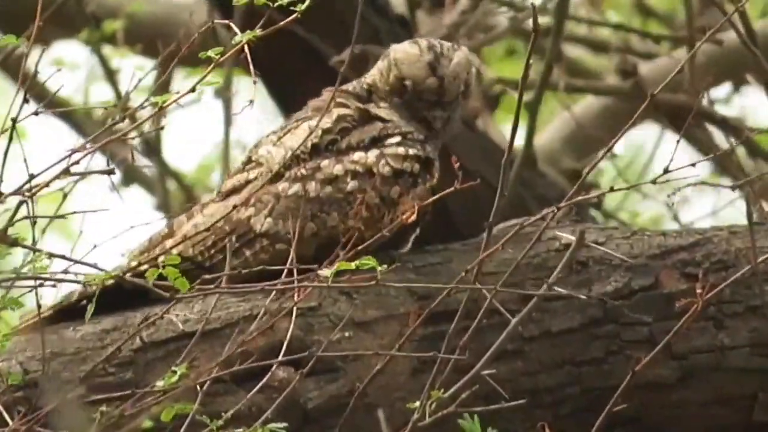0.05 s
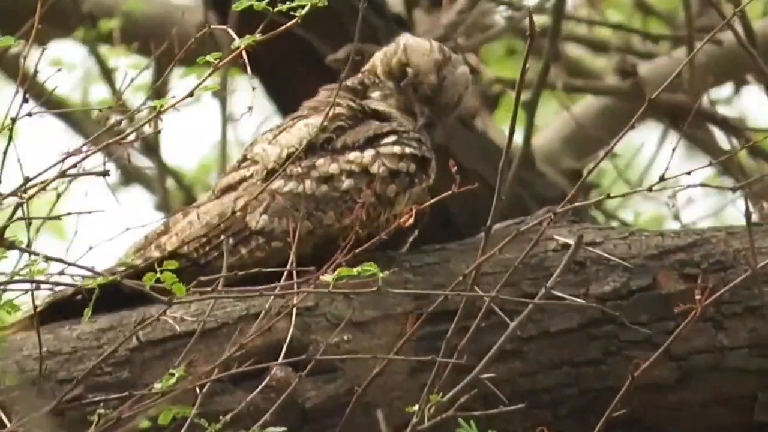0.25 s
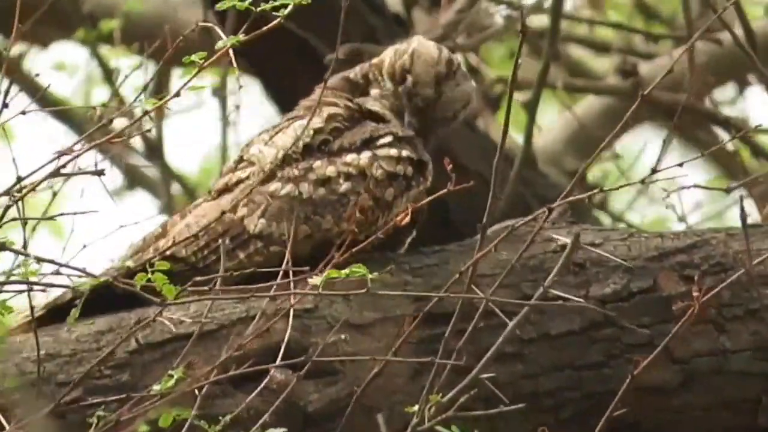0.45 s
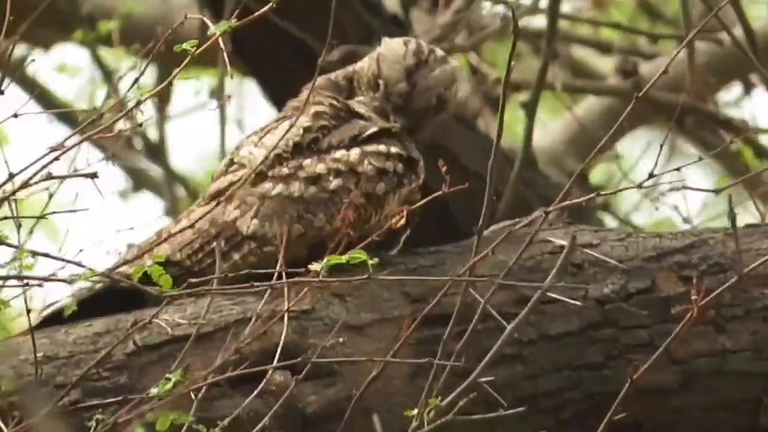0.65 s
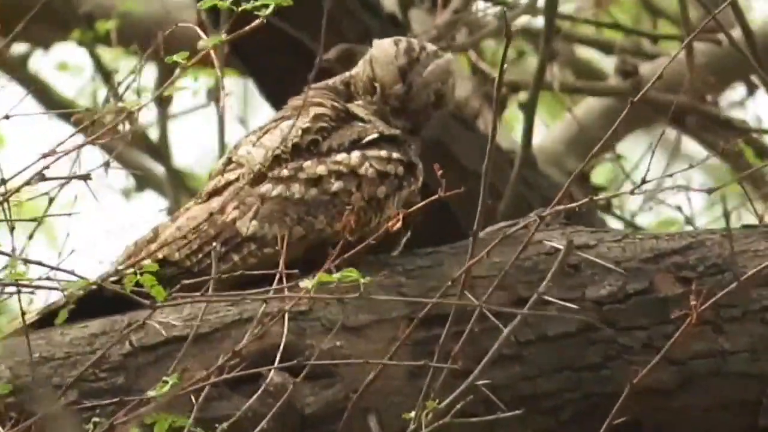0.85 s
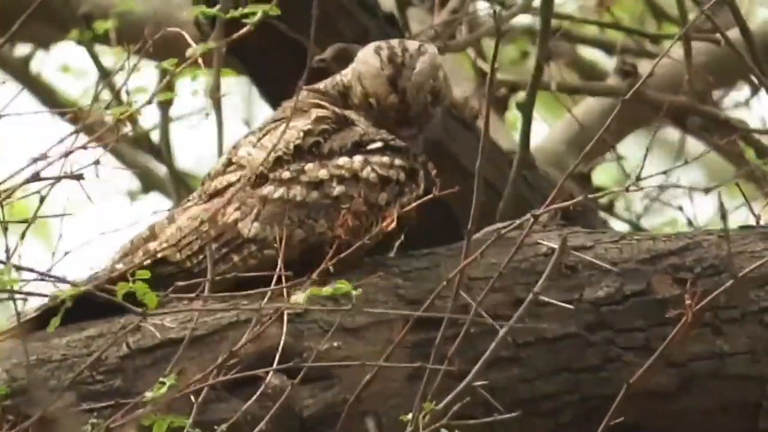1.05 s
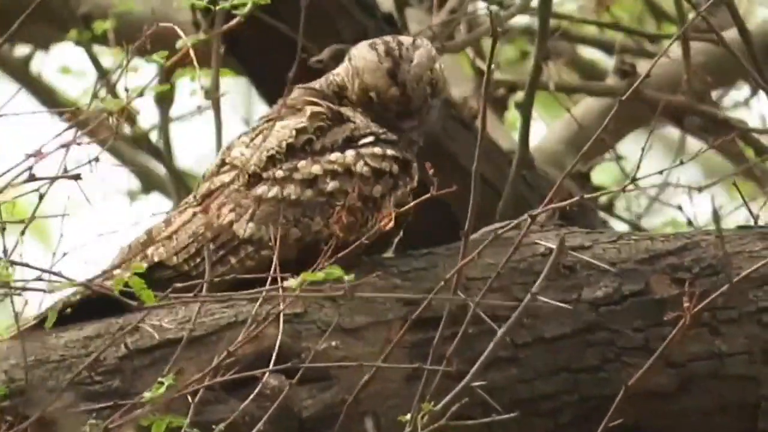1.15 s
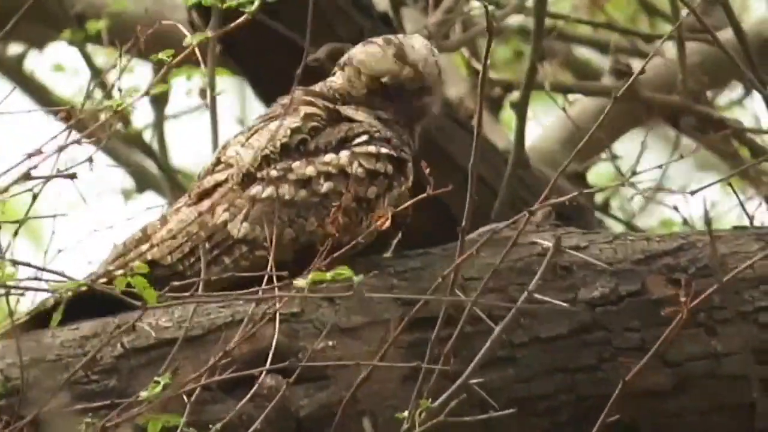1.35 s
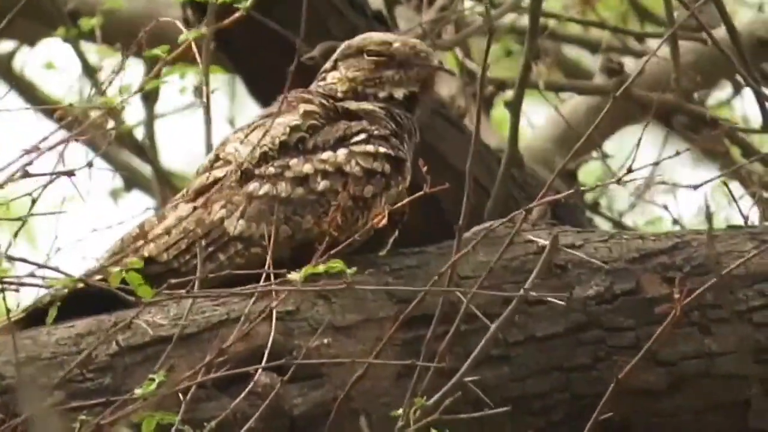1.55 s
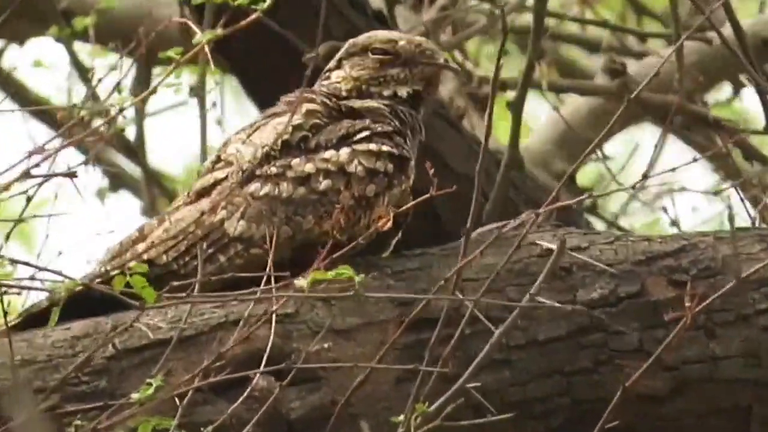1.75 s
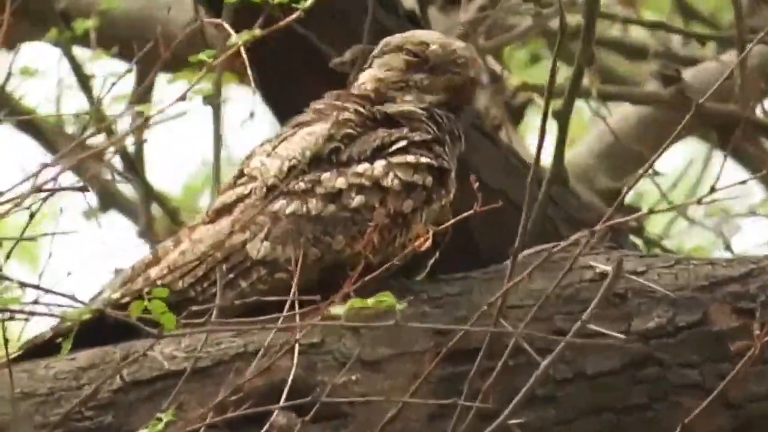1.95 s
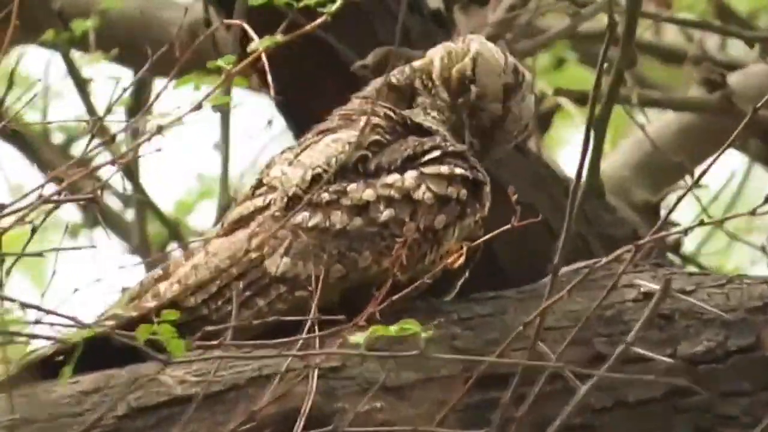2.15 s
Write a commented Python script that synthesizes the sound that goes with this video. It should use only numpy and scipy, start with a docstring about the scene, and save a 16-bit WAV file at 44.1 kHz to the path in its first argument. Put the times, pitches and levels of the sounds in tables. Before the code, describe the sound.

Wind flutters and thumps on the microphone, with faint distant bird chirps in a quiet wood.

```python
"""Wind on a camera in a wood

Light wind buffets the two microphone ports: short gusts flutter and single eddies thump.
Behind them lie a low rumble and the wide hiss of the trees, with a few faint, far bird notes
and one small tick near the end. A thin whine, probably the lens motor, runs throughout."""
import sys
import numpy as np
from scipy import signal
from scipy.fft import rfft, irfft
from scipy.io import wavfile
from scipy.ndimage import uniform_filter1d

SR = 44100
rng = np.random.default_rng(int(sys.argv[2]) if len(sys.argv) > 2 else 0)


def to_wav(s):
    """Save 16-bit WAV."""
    ch = np.atleast_2d(s).T  # columns
    pcm = np.round(np.clip(ch, -1, 1) * 32767)  # PCM
    wavfile.write(sys.argv[1], SR, pcm.astype(np.int16))


N = 97020


def undb(db):
    """Decibels to gain."""
    return 10 ** (np.asarray(db) / 20)


def times():
    """Time of every sample, in seconds."""
    return np.arange(N) / SR


def unit(x):
    """Scale to rms 1."""
    return x / np.sqrt(np.mean(x ** 2))


def colour(x, curve):
    """EQ through (freq_hz, gain_db) points joined on a log-frequency axis."""
    hz, db = np.array(curve, float).T
    gain_db = np.interp(np.log(np.fft.rfftfreq(N, 1 / SR) + 1), np.log(hz), db)
    return irfft(rfft(x) * undb(gain_db), N)


def lowpass(x, hz, order):
    """Low-pass without delay."""
    return irfft(rfft(x) / np.sqrt(1 + (np.fft.rfftfreq(N, 1 / SR) / hz) ** (2 * order)), N)


def noise(curve):
    """Noise coloured by an EQ curve, rms 1."""
    return unit(colour(rng.standard_normal(N), curve))


def running_rms(power, window_s):
    """Level follower: the root of the power averaged over a sliding window."""
    return np.sqrt(uniform_filter1d(power, int(window_s * SR)))


def stereo(mid, side):
    """Left and right from mid and side."""
    return np.array([mid + side, mid - side])


def pan(db):
    """Left and right gains for a level difference; positive leans left."""
    return undb(np.array([[db], [-db]]) / 2)


def wander(rate_hz):
    """Smooth random modulation, rms 1, rolling off above half the rate."""
    return unit(lowpass(rng.standard_normal(N), rate_hz / 2, order=3))


def bell(centre_s, half_s):
    """Gaussian fade in and out around a moment."""
    return np.exp(-.5 * ((times() - centre_s) / half_s) ** 2)


def blurred_tone(hz, width_hz):
    """A steady or gliding tone with scattered phase, different left and right."""
    phase = 2 * np.pi * np.cumsum(hz * np.ones(N)) / SR
    voice = lambda: unit(np.sin(phase + 2 * np.pi * rng.random() + 0.88 * wander(2 * width_hz)))
    return stereo(voice(), .5 * voice())


# Tone of the air and leaves: freq_hz, gain_db
LEAF_EQ = [(60, -5), (150, -5), (280, -3), (450, -8.5), (800, -11), (1500, -16), (2000, -14), (2550, -13.5),
           (3100, -19), (4500, -21.5), (6700, -24), (7600, -25.5), (9200, -35), (12000, -33), (15500, -43)]
# Stereo width of the hiss: freq_hz, side_minus_mid_db
LEAF_WIDTH = [(60, -27), (200, -13.5), (600, -4.5), (1200, -2), (2400, -8), (4500, -6.5), (6700, -2),
              (7300, -5), (10000, -11), (13000, -29)]


def trees(level_db=-51.5, flicker_db=0.33):
    """Air through leaves: a wide, even bed of hiss."""
    hiss = stereo(noise(LEAF_EQ), colour(noise(LEAF_EQ), LEAF_WIDTH))
    return hiss * undb(level_db + flicker_db * wander(rate_hz=4.8))


# Tone of the rumble, peaking at 50 Hz: freq_hz, gain_db
RUMBLE_EQ = [(20, -31), (33, -35), (43, -6.5), (50, 10.5), (56, -1), (68, -2), (85, -6.5), (140, -15)]
# Fader ride of the rumble: time_s, level_db
RUMBLE_RIDE = [(0, -59), (.15, -49), (.45, -50.5), (.7, -41.5), (1.2, -41), (1.9, -42.5), (2.2, -46.5)]


def rumble():
    """A narrow mono rumble that builds as the wind comes in."""
    low = lowpass(noise(RUMBLE_EQ), hz=153, order=4)
    time_s, level_db = np.array(RUMBLE_RIDE).T
    ride = undb(np.interp(times(), time_s, level_db))
    return ride * low / running_rms(low ** 2, window_s=.05)


# Motor tones, near multiples of 500 Hz: pitch_hz, level_db (before trim and ride), side_minus_mid_db
MOTOR_TONES = [(4982, -83, -1), (5481, -76.5, -1), (5987, -76.5, 1), (6470, -73.5, 0), (7038, -85, -15),
               (7456, -86, -10)]
# Fader rides of the tones near 5.5, 6 and 6.5 kHz: time_s, low_gain_db, middle_gain_db, high_gain_db
MOTOR_RIDES = [(0, 8, 5, 2.5), (.22, 7.5, -2, 8), (.65, 2, 0.5, -6), (.9, -2, 5.5, 0), (1.13, 7, 9.5, 7),
               (1.55, 10, -5, 2), (1.72, 3, 11, 6), (2.2, -7, 5, 1)]
# Brief swells near 6.4 kHz: centre_s, half_length_s, level_db
MOTOR_SWELLS = [(0.284, 0.029, -67), (0.894, 0.035, -64), (1.12, 0.027, -63.5), (1.812, 0.031, -81)]


def motor_whine(trim_db=-3.5, waver_db=3.5, jitter_hz=4.93, sideband_hz=62, sideband_db=-5.5):
    """Thin, wavering motor tones with a sideband either side, and a blurred tone that swells at times."""
    time_s, *strong_rides = np.array(MOTOR_RIDES).T
    rides_db = [0, *(np.interp(times(), time_s, ride) for ride in strong_rides), 0, 0]
    out = 0
    for (pitch_hz, level_db, side_db), ride_db in zip(MOTOR_TONES, rides_db):
        for offset_hz, part_db in [(0, 0), (-sideband_hz, sideband_db), (sideband_hz, sideband_db)]:
            hz = pitch_hz + offset_hz + jitter_hz * wander(rate_hz=26.7)
            phase = 2 * np.pi * np.cumsum(hz) / SR
            rms = undb(level_db + ride_db + part_db + trim_db + waver_db * wander(rate_hz=9))
            out = out + np.sqrt(2) * rms * stereo(np.sin(phase), undb(side_db) * np.cos(phase))
    swells = sum(undb(db) * bell(centre_s, half_s) for centre_s, half_s, db in MOTOR_SWELLS)
    return out + swells * blurred_tone(hz=6407, width_hz=66)


# Far bird notes, in pairs: centre_s, level_db
BIRD_NOTES = [(0.151, -61), (.192, -57), (.42, -62), (0.467, -61), (.708, -57), (0.747, -53), (.947, -59),
              (0.986, -55.5), (1.198, -58.5), (1.238, -65), (1.445, -63), (1.482, -59)]


def bird_notes(top_hz=2810, arch_hz=130, half_s=.008):
    """Short, rough bird notes that arch up and down in pitch."""
    arch = sum(bell(centre_s, half_s) for centre_s, _ in BIRD_NOTES)
    envelope = sum(undb(db) * bell(centre_s, half_s) for centre_s, db in BIRD_NOTES)
    return envelope * blurred_tone(top_hz - arch_hz * (1 - arch), width_hz=160)


def bird_whistle(centre_s=.07, pitch_hz=4500, rise_hz_per_s=14000, level_db=-63):
    """One faint, rough whistle that sweeps upward."""
    age = times() - centre_s
    phase = 2 * np.pi * (pitch_hz * age + rise_hz_per_s * age ** 2 / 2)
    return undb(level_db) * bell(centre_s, half_s=.035) * np.sin(phase + wander(rate_hz=300))


# Tone of the tick, peaking near 2.4 kHz: freq_hz, gain_db
TICK_EQ = [(1000, -32), (1850, -14), (2150, -3), (2430, 2), (2850, -9), (3600, -22), (4700, -17),
           (7000, -40), (11000, -60)]


def tick(level_db=-47):
    """One small, dry, scratchy tick, a little to the right."""
    scratch = stereo(noise(TICK_EQ), .4 * noise(TICK_EQ))
    return scratch * undb(level_db) * bell(centre_s=2.033, half_s=.007) * pan(db=-2)


WIND_TOP_HZ = 487.6  # gusts and eddies both roll off steeply here
# Tone of the buffeting: freq_hz, gain_db
GUST_EQ = [(30, -46), (60, 2), (110, 7), (170, 3), (260, -3.5), (350, -11.5), (450, -16), (600, -36)]
# Stereo width of the buffeting, mono in the bass: freq_hz, side_minus_mid_db
GUST_WIDTH = [(50, -59), (120, -28), (250, -8), (450, 3)]
# Gusts hitting the microphone: start_s, length_s, level_db (before trim)
GUST_CUES = [(0.201, 0.073, -30.5), (0.287, .07, -33.5), (0.369, 0.013, -34), (0.48, 0.014, -32.5),
             (0.535, 0.018, -32), (0.563, 0.029, -38), (0.604, 0.058, -38), (0.692, 0.016, -36),
             (0.739, 0.029, -33), (0.827, 0.022, -29), (0.854, 0.066, -28.5), (0.921, .135, -36.5),
             (1.082, 0.068, -30.5), (1.189, 0.051, -43), (1.278, 0.029, -37.5), (1.396, 0.058, -30.5),
             (1.504, 0.12, -41), (1.631, 0.034, -32), (1.674, 0.04, -42), (1.749, 0.13, -30),
             (1.895, 0.059, -39)]


def gusts(attack_s=0.0054, release_s=0.0072, sag_db_per_s=49, flutter_db=1, trim_db=0.5):
    """Turbulence on the ports: each gust rises fast, flutters, sags and drops away."""
    power = 0
    for start_s, length_s, level_db in GUST_CUES:
        age = times() - start_s
        rise = np.clip(age / attack_s + .5, 0, 1)
        body = undb(level_db - sag_db_per_s * np.maximum(age, 0))
        fall = np.exp(-np.maximum(age - length_s, 0) / release_s)
        power = power + (rise * body * fall) ** 2
    flow = lambda: unit(lowpass(noise(GUST_EQ), WIND_TOP_HZ, order=14))
    churn = stereo(flow(), colour(flow(), GUST_WIDTH))
    # Even out the noise so that the cues shape the dynamics.
    churn = churn / running_rms(np.mean(churn ** 2, axis=0), window_s=.03)
    flutter = undb(flutter_db * wander(rate_hz=69))
    return churn * np.sqrt(power) * flutter * undb(trim_db) * pan(db=1)


# Thumps of single eddies: centre_s, level_db (before trim), pitch_hz, width_s, left_minus_right_db
EDDY_CUES = [(.212, -13, 248, 0.0006, 6), (.239, -20, 240, 0.0023, 3), (0.269, -25, 276, 0.0029, 5),
             (0.292, -33.5, 180, 0.0048, -1), (0.325, -15.5, 137, 0.0015, 2.5),
             (.346, -21.5, 192, 0.0018, 6), (.526, -13, 306, 0.0012, 7), (0.534, -23.5, 238, 0.0069, 3),
             (.659, -21, 155, 0.002, 5), (0.772, -24.5, 94, 0.0072, -3), (0.622, -18.5, 126, 0.0052, 6.5),
             (.626, -17, 306, 0.001, -9), (0.751, -21.5, 135, 0.0046, 5), (.804, -23, 175, 0.0028, 6),
             (.853, -13, 239, 0.0015, 9), (0.867, -19.5, 213, 0.0055, 9.5), (0.879, -18, 308, 0.0012, 16),
             (0.895, -19.5, 241, 0.0021, -6.5), (.951, -22, 194, 0.0014, -9), (.973, -24.5, 152, 0.0018, 6),
             (1.003, -23, 150.6, 0.0023, 5), (1.051, -24.5, 132, 0.0034, 4.5),
             (1.089, -20.5, 280, 0.0025, -14), (1.099, -12, 184, 0.0017, 6), (1.139, -20, 117, 0.0046, -5),
             (1.197, -22, 204, 0.0023, 7), (1.299, -25, 174, 0.0042, 6), (1.326, -23.5, 165, 0.0015, 10.5),
             (1.411, -18, 270.5, 0.0032, 14.5), (1.439, -16, 178, 0.0012, 10),
             (1.456, -24.5, 250, 0.0048, 9), (1.759, -12, 111, 0.0031, 6), (1.818, -22, 161, 0.001, 20),
             (1.849, -22, 155, 0.0032, 5), (1.875, -23, 120, 0.0032, 2), (1.931, -25.5, 163, 0.0018, -9)]


def eddies(trim_db=-2, low_cut_hz=37.6, mono_below_hz=103):
    """Each eddy is a brief pressure swing, stronger on one port; its deep bass reaches both alike."""
    thumps = 0
    for centre_s, level_db, pitch_hz, width_s, pan_db in EDDY_CUES:
        age = times() - centre_s
        envelope = (1 + (age / width_s) ** 2 / 2) ** -2
        swing = np.cos(2 * np.pi * (pitch_hz * age + rng.random()))
        thumps = thumps + undb(level_db + trim_db) * pan(pan_db) * envelope * swing
    left, right = lowpass(thumps, WIND_TOP_HZ, order=14)
    mid, side = (left + right) / 2, (left - right) / 2
    mid = mid - lowpass(mid, low_cut_hz, order=4)
    side = side - lowpass(side, mono_below_hz, order=3)
    return stereo(mid, side)


def scene():
    """Wind on the microphone up front, the quiet wood and the motor behind."""
    wind = gusts() + eddies()
    return wind + rumble() + trees() + motor_whine() + bird_notes() + bird_whistle() + tick()


def record(dry, top_hz=15700):
    """The camera cuts the top treble with a steep low-pass."""
    return signal.sosfilt(signal.ellip(10, .2, 80, top_hz, fs=SR, output="sos"), dry)


dry = scene()
out = record(dry)
to_wav(out)
```